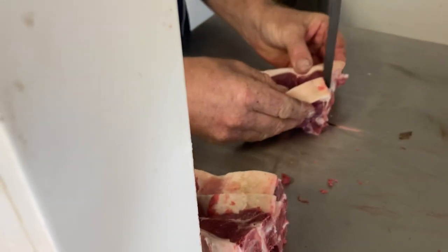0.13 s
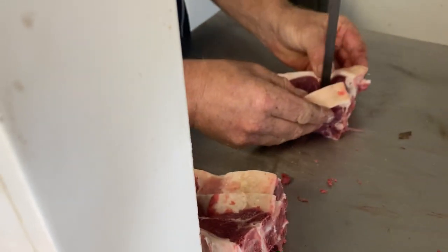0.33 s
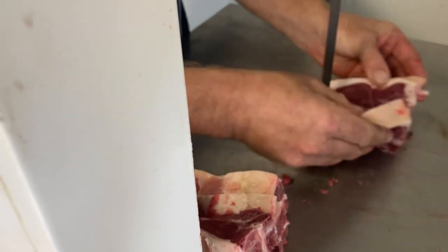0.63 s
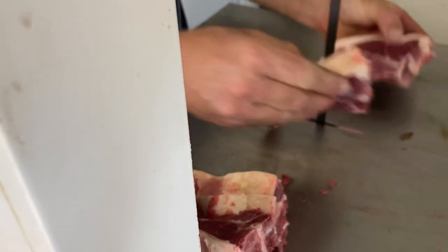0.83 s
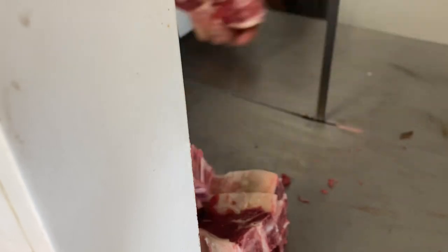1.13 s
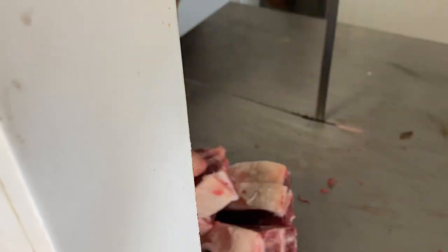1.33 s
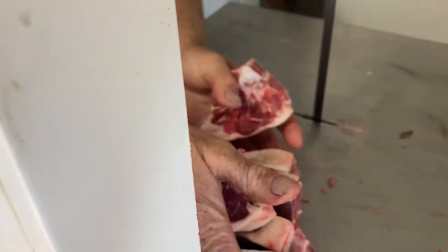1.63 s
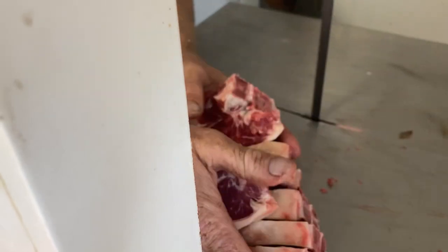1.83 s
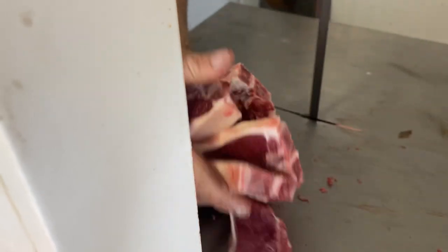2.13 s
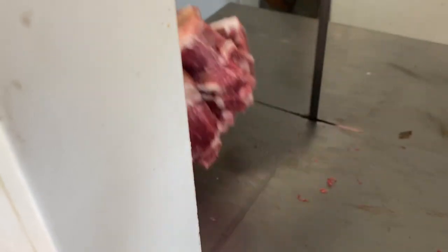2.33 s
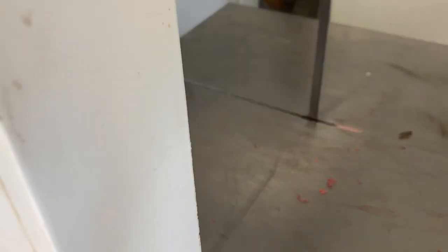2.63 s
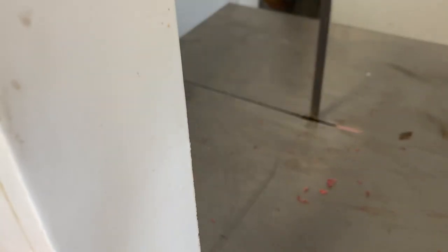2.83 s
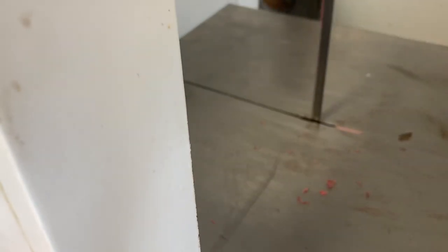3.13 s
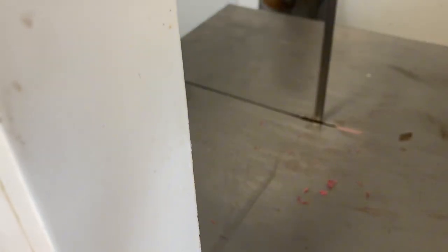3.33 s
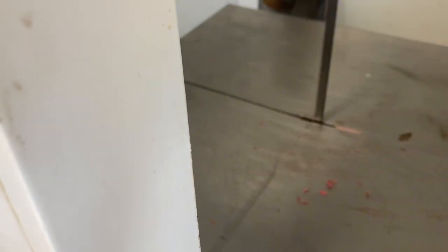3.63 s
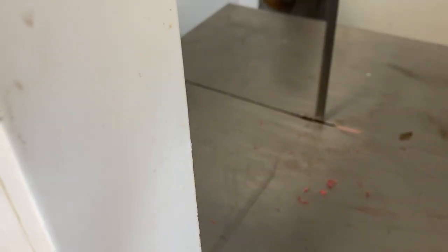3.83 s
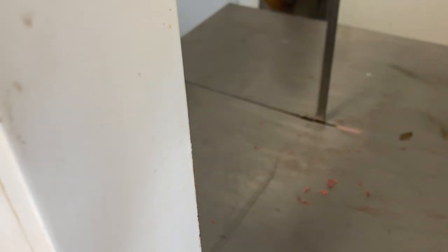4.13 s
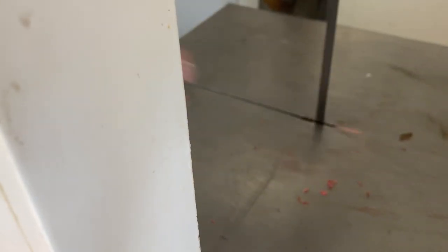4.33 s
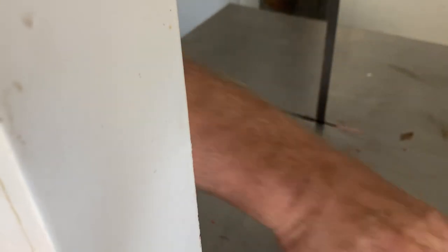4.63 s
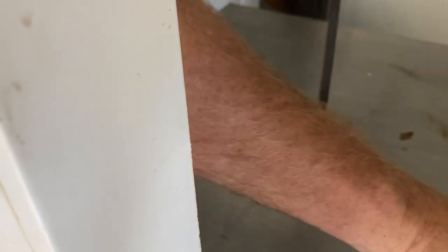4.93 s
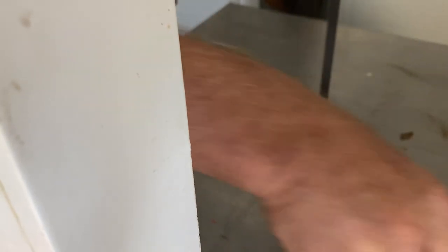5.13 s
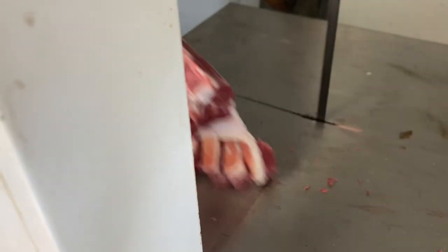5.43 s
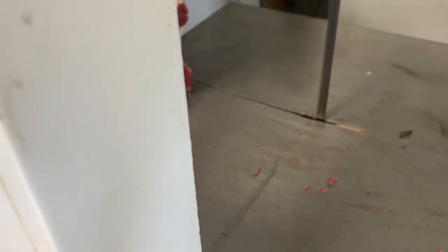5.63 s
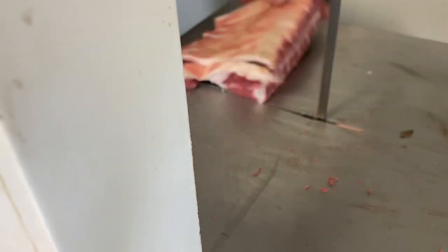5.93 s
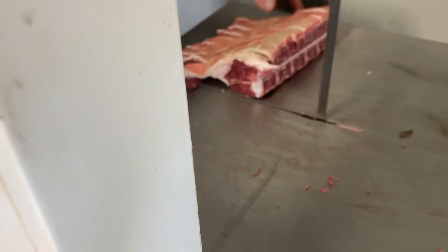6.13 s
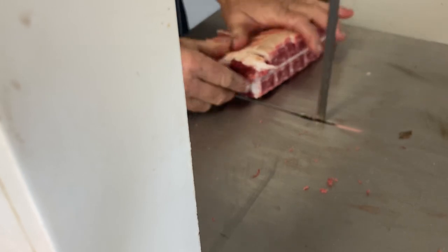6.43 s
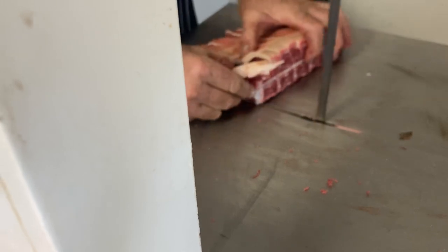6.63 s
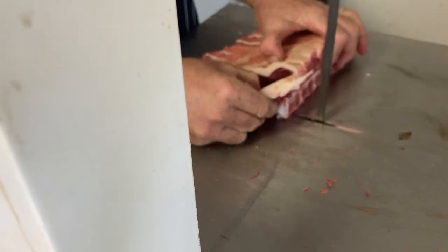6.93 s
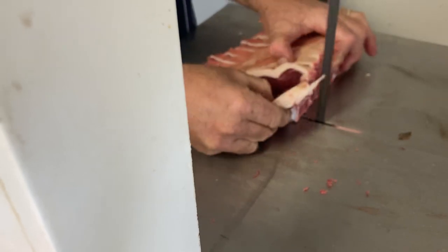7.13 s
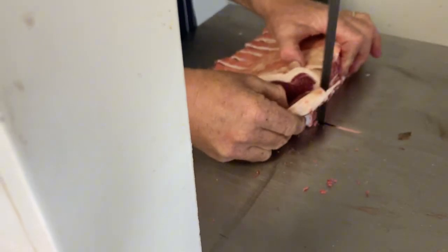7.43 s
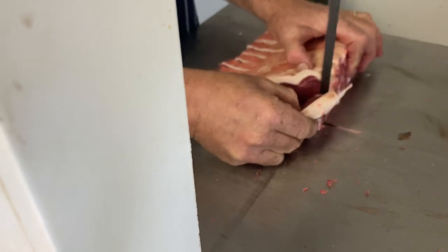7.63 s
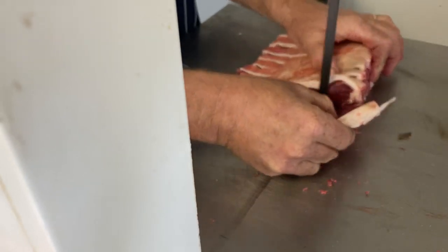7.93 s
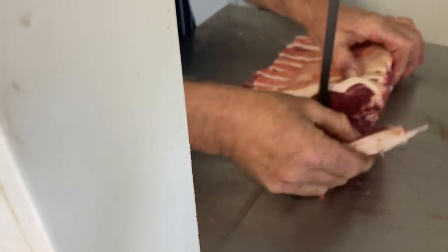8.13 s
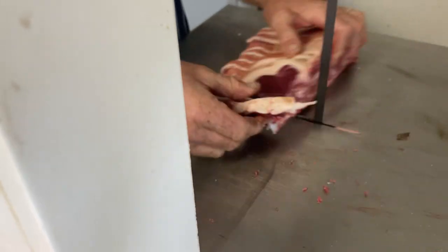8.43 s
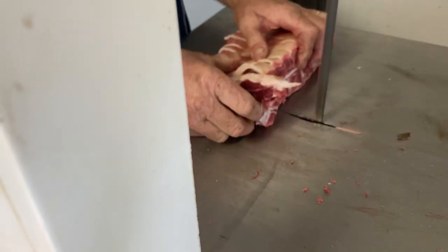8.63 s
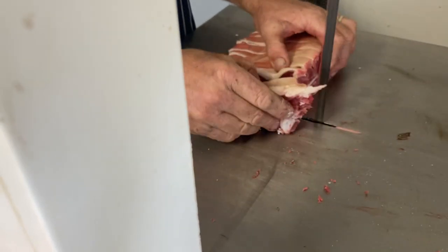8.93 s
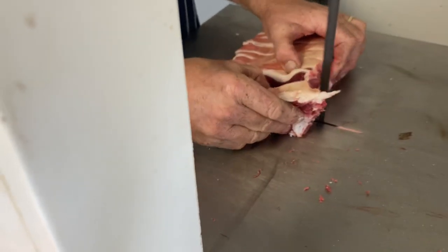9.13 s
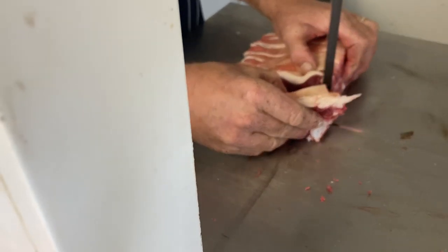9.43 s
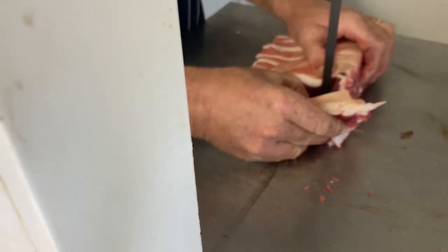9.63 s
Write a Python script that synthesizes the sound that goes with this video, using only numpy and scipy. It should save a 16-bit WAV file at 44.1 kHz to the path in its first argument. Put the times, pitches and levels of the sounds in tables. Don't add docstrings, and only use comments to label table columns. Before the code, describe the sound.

Close bandsaw drone with hissing blade, brief harsh cuts through bony meat at start and end, and quick even board taps during the idle.

```python
import sys
import numpy as np
from scipy import signal
from scipy.fft import rfft, irfft, next_fast_len
from scipy.io import wavfile
from scipy.ndimage import uniform_filter1d, map_coordinates

SR = 44100
rng = np.random.default_rng(int(sys.argv[2]) if len(sys.argv) > 2 else 0)


def put_to_file(sound):
    columns = np.atleast_2d(sound).T
    safe = np.clip(columns, -1, 1)
    whole_steps = np.round(safe * 32767)
    wavfile.write(sys.argv[1], SR, whole_steps.astype(np.int16))


def boost(x):
    u = np.asarray(x, float) / 20
    return 10 ** u


N = 431738
HUM_HZ, TOOTH_HZ = 100.07, 921.5


def unit(x):
    return x / np.sqrt(np.mean(x ** 2) + 1e-20)


def along(points, hz):
    f, value = np.transpose(points)
    return np.interp(np.log(hz + 1), np.log(f + 1), value)


def curves(rows):
    s, *columns = np.transpose(rows)
    t = np.arange(N) / SR
    return [np.interp(t, s, column, left=-120, right=-120) for column in columns]


def wobble(rate, size=N):
    coarse = np.arange(0, size + 32, 32)
    knots = rng.standard_normal(int(size * rate / SR) + 4)
    return np.interp(np.arange(size), coarse, map_coordinates(knots, [coarse * rate / SR]))


def filtered(x, response):
    n = x.shape[-1]
    m = next_fast_len(n + SR // 2)
    return irfft(rfft(x, m) * response(np.fft.rfftfreq(m, 1 / SR)), m)[..., :n]


def rush(response, patchy_db, size=N):
    z = signal.stft(rng.standard_normal(size + 512), nperseg=512)[2]
    field = uniform_filter1d(rng.standard_normal(z.shape), size=6, axis=0)
    field = uniform_filter1d(field, size=10, axis=1)
    patchy = signal.istft(z * boost(patchy_db * unit(field)), nperseg=512)[1][:size]
    return unit(filtered(patchy, response))


def room(x, t60, wet_db):
    t = np.arange(SR // 2) / SR
    tail = rng.standard_normal(len(t)) * boost(-60 * t / t60) * (t > .008)
    return x + boost(wet_db) * signal.fftconvolve(x, tail / np.linalg.norm(tail))[:N]


def swells(rows, t):
    s, half, *columns = np.transpose(rows)[..., None]
    coarse = t[::64]
    bells = np.exp(-np.abs((coarse - s) / half) ** 2.0) + 1e-6
    return lambda weigh: np.interp(t, coarse, (bells * weigh).sum(0)), columns


# time in seconds, hum level in dB, blade hiss relative to the hum in dB.
GAIN = [(0.0, -25, -31), (0.6, -24.5, -40), (0.8, -27, -29.5), (1.15, -25.5, -29.5), (1.26, -21.5, -28.5),
        (1.7, -22, -30), (2.3, -21.5, -27), (3.4, -21.5, -30.5), (4.2, -20.5, -29), (4.65, -20.5, -31.5),
        (5.45, -19.3, -27.5), (7.52, -17.5, -27.5), (7.63, -25, -22), (7.9, -22.5, -26),
        (8.0, -17.5, -29.5), (9.36, -18, -30), (9.5, -25, -31), (9.79, -21, -21)]
# distance below the hum in Hz, level relative to the hum in dB, moment in step in seconds.
BEATS = [(5.04, -16.6, 5.092), (10.086, -17.1, 5.013), (15.112, -27.2, 4.992), (25.2, -35.9, 5.004),
         (7.538, -20.4, 5.017), (22.602, -37.8, 5.004), (9.374, -19.2, 5.026), (2.136, -30.3, 4.855),
         (17.132, -32.2, 4.997), (19.43, -35.6, 4.981), (-20.546, -34, 5.006)]


def hum():
    level, t = boost(curves(GAIN)[0]), np.arange(N) / SR
    turn = 2 * np.pi * HUM_HZ * t
    throb_db = 0.4
    beats = sum(boost(db + throb_db) * np.sin(turn - 2 * np.pi * hz * (t - s)) for hz, db, s in BEATS)
    octave = boost(-18.5 + 1.4 * wobble(9)) * np.sin(2 * turn + 0.68 * wobble(6.4))
    return level * (np.sqrt(2) * (np.sin(turn) + beats) + octave)


# frequency in Hz, density in dB per Hz.
CABINET = [(20, -60), (64, -26), (80, -18.5), (110, -28), (170, -28), (500, -31.5), (780, -32),
           (1300, -31.5), (1970, -40.5), (2770, -37), (3500, -42), (4480, -38), (6000, -47.5),
           (11000, -61.5)]
# centre in Hz, width in Hz, level in dB.
PANELS = [(137, 44, -0.5), (220.4, 22, 4), (370.5, 22, 0.5), (422, 18, -1), (465, 39, 1), (558, 51, -4.5),
          (703, 15, -6.5), (1010, 19, 0), (1133, 33, -3), (1213, 43, 0.5), (1840, 44, -3), (2457, 70, 5.5),
          (2682, 95, 2.5), (2900, 200, -2.5), (2980, 80, -2.5), (4320, 112, 2), (4610, 120, 5),
          (5020, 530, 0.5), (5537, 196, 7), (6640, 470, 1.5)]
# frequency in Hz, rms level in dB.
WHINES = [(500.6, -48.5), (958.2, -53), (1249, -52.5), (1351, -50.5), (2406, -50), (2676, -54.5),
          (2853, -50)]
# frequency in Hz, density in dB per Hz.
AIR = [(3000, -34), (5000, -4), (6570, -3.5), (10100, -10), (13000, -10), (15300, -10.5), (16000, -10)]


def cabinet_response(f):
    peaks = 1 + sum(boost(db + 6) ** 2 / (1 + (2 * (f - c) / width) ** 2) ** 2 for c, width, db in PANELS)
    return boost(along(CABINET, f)) * np.sqrt(peaks)


def machine():
    hum_db, load_db = curves(GAIN)
    t = np.arange(N) / SR
    drone = boost(7.5 + 0.37 * wobble(9)) * rush(cabinet_response, patchy_db=0.74)
    whines = 0
    for hz, db in WHINES:
        level = boost(db + 42.5 + 2.6 * wobble(13))
        whines = whines + level * np.sin(2 * np.pi * hz * t + 0.86 * wobble(12))
    air_level = boost(hum_db + load_db + 4.5 + 0.59 * wobble(25) + 1.3 * wobble(80))
    air = air_level * rush(lambda f: boost(along(AIR, f)), patchy_db=2.0)
    return boost(hum_db - 19.5) * (drone + whines) + air


# frequency in Hz, density in dB per Hz.
TEARING = [(710, -18), (1200, -3), (1320, -12), (1700, -8), (1810, -8), (2090, -6.5), (2680, -2.5),
           (3910, -6), (5530, 0.5), (16000, -1)]


def tearing(tear_db, t):
    once_a_tooth = 1 + 0.26 * np.cos(2 * np.pi * TOOTH_HZ * t)

    def colour(f):
        phase = np.pi * f / TOOTH_HZ
        comb = 1 + 1.17 * np.cos(phase) ** 70 + 0.9 * np.sin(phase) ** 70
        return boost(along(TEARING, f)) * comb

    flutter = boost(1.5 * wobble(90, size=len(t)))
    rip = unit(once_a_tooth * flutter * rush(colour, patchy_db=1.0, size=len(t)))
    deep = filtered(rip, lambda f: 1 / (1 + (f / 4500) ** 4))
    push = boost(tear_db + 1.5)
    sunk = signal.lfilter([1 / 1500], [1, 1 / 1500 - 1], push, zi=[push[0]])[0]
    return boost(tear_db + 4.0) * (rip - deep) + 1.9 * sunk * deep


def sliding(noise, centre_hz, width):
    bank = np.geomspace(350, 900, 7)
    step = np.log(bank[1] / bank[0])
    place = np.log(np.clip(centre_hz, bank[0], bank[-1]))
    out = 0
    for c in bank:
        share = np.clip(1 - abs(place - np.log(c)) / step, 0, 1)
        band = filtered(noise, lambda f: 1 / (1 + (np.log((f + 1) / c) / width) ** 2))
        out = out + np.sqrt(share) * unit(band)
    return out


def steady(x):
    return unit(x / np.sqrt(np.abs(uniform_filter1d(x ** 2, size=1300) + 1e-9)))


# frequency in Hz, density in dB per Hz.
GRIND = [(120, -45), (200, -23.5), (410, -8), (456, -12), (816, -9.5), (926, -5.5), (1130, -18),
         (1330, -11), (2500, -22), (3250, -52), (5500, -120)]
# time in seconds, half length in seconds, grind in dB, pitch in Hz.
BONES = [(0.09, 0.071, -34, 607), (0.245, 0.06, -27, 760), (0.34, 0.025, -43, 590),
         (0.495, 0.071, -29, 644), (0.59, 0.071, -36, 607), (7.575, 0.025, -40, 467),
         (7.68, 0.074, -39.5, 620), (7.79, 0.046, -35.5, 545), (7.93, 0.066, -38, 577),
         (8.015, 0.028, -24, 670), (8.095, 0.042, -26, 475), (8.18, 0.06, -30.5, 554),
         (9.39, 0.029, -30.5, 493), (9.53, 0.078, -34, 540), (9.61, 0.03, -37, 620), (9.7, 0.05, -45, 570),
         (9.79, 0.027, -23, 520)]


def grinding(t):
    on_bone, (bone_db, bone_hz) = swells(BONES, t)
    grind_hz = on_bone(boost(bone_db) * bone_hz) / on_bone(boost(bone_db))
    bone = rush(lambda f: boost(along(GRIND, f)), patchy_db=2.5, size=len(t))
    return on_bone(boost(bone_db - 0.7)) * steady(1.15 * bone + sliding(bone, grind_hz, width=0.1))


def teeth(colour, t, waver_db, rough_db, drift):
    hz = TOOTH_HZ / 2 * np.arange(1, 25)
    odd = np.arange(len(hz)) % 2 == 0
    level_db = along(colour, hz) - 4 * odd
    turn = 2 * np.pi * t + drift * wobble(60, size=len(t)) / TOOTH_HZ
    heard, out = level_db > -32, 0
    for f, db in zip(hz[heard], level_db[heard]):
        depth_db = waver_db * np.tanh(-db / 6 + 0.15)
        waver = depth_db * wobble(30.06, size=len(t))
        out = out + boost(db + waver) * np.sin(f * turn + rng.uniform(0, 2 * np.pi))
    return unit(out * boost(rough_db * wobble(150, size=len(t))))


# frequency in Hz, level in dB.
NOTE = [(300, -30), (460, -5.5), (920, 0), (1400, -5), (1840, -9.5), (2300, -15), (2760, -18), (3300, -11),
        (4200, -57)]
# frequency in Hz, level in dB.
RING = [(2000, -40), (2770, -20), (3230, -16), (3690, 0), (4150, -13), (4610, -15), (5530, -19),
        (6450, -22), (7380, -15), (8300, -24), (10100, -19), (12000, -28)]
# time in seconds, half length in seconds, tooth note in dB, blade ring in dB.
SONGS = [(0.0, 0.03, -33.5, -44), (0.065, 0.04, -31.5, -39), (0.15, 0.05, -29.5, -46),
         (0.285, 0.041, -30, -51), (0.39, 0.045, -35.5, -39), (0.495, 0.044, -43, -21),
         (0.56, 0.037, -37, -29.5), (7.56, 0.06, -47, -50), (7.66, 0.054, -33.5, -48),
         (7.78, 0.058, -30.5, -40), (7.89, 0.095, -37, -56), (8.04, 0.053, -24.5, -44),
         (8.12, 0.04, -44, -55), (9.37, 0.03, -45, -42), (9.43, 0.035, -30, -32.5), (9.52, 0.088, -37, -51),
         (9.61, 0.032, -27.5, -48), (9.69, 0.044, -35, -51), (9.79, 0.028, -24, -34)]


def singing(t):
    in_song, (sung_db, rung_db) = swells(SONGS, t)
    note = teeth(NOTE, t, waver_db=3.5, rough_db=3.3, drift=1.2)
    ring = teeth(RING, t, waver_db=3, rough_db=2.8, drift=.38)
    ring_db = 20 * np.log10(in_song(boost(rung_db)))
    squeal_db = ring_db + 0.27 * np.minimum(ring_db + 26, 0)
    return in_song(boost(sung_db)) * note + boost(squeal_db + 2.9) * ring


# time in seconds, tearing level in dB.
FEED = [
    [(0.0, -26), (0.15, -29), (0.246, -28), (0.274, -31), (0.308, -71), (0.34, -62)],
    [(0.34, -62), (0.362, -34.5), (0.404, -28), (0.488, -31), (0.552, -26.5), (0.648, -66), (0.72, -64)],
    [(7.44, -51), (7.522, -21.5), (7.574, -23), (7.616, -27.5), (7.714, -24), (7.756, -26), (7.8, -33),
     (7.83, -55), (7.892, -64)],
    [(7.892, -63), (7.968, -37), (8.014, -37), (8.058, -43), (8.096, -40), (8.168, -48), (8.3, -61)],
    [(9.28, -47), (9.325, -52), (9.333, -23), (9.418, -23), (9.526, -26.5), (9.612, -29), (9.652, -60),
     (9.742, -49), (9.79, -29)],
]


def cutting():
    feed_db = np.max([curves(bite)[0] for bite in FEED], axis=0)
    biting = feed_db > -119
    t = np.flatnonzero(biting) / SR
    sound = np.zeros(N)
    sound[biting] = tearing(feed_db[biting], t) + grinding(t) + singing(t)
    return room(sound, t60=0.26, wet_db=-8.0)


def puffs(rows, width, rise, gain_db):
    out, t = np.zeros(N + SR), np.arange(SR // 4) / SR
    f = np.fft.rfftfreq(len(t), 1 / SR)
    for s, db, hz, t60 in rows:
        band = 1 / (1 + (np.log((f + 1) / hz) / width) ** 4)
        noise = unit(irfft(rfft(rng.standard_normal(len(t))) * band, len(t)))
        envelope = boost(db + gain_db - 60 * t / max(t60, .01)) * (1 - np.exp(-t / rise))
        out[round(s * SR):][:len(t)] += envelope * noise
    return out[:N]


# start in seconds, peak level in dB, pitch in Hz, 60 dB decay in seconds.
SCUFFS = [(.26, -19, 1380, 0.077), (.435, -20, 1500, .06), (.475, -7, 1700, 0.055),
          (.547, -15.5, 1580, 0.12), (1.07, -30, 2400, .06), (2.279, -22, 1400, 0.074),
          (3.62, -25, 1900, 0.19), (3.622, -25, 1700, 0.17), (3.624, -23, 1050, 0.19),
          (7.975, -16.5, 3660, 0.17), (8.008, -22, 1330, 0.092), (8.069, -28, 1340, 0.1),
          (9.532, -21, 2730, .1), (9.595, -10, 1300, 0.074), (9.76, -15, 1200, .12)]


def scuffs():
    return puffs(SCUFFS, width=0.4, rise=0.011, gain_db=-5.5)


# start in seconds, peak level in dB, pitch in Hz.
TICKS = [(1.0705, -29, 9700), (1.4137, -32, 14000), (1.5404, -30, 12600), (1.7045, -28, 12300),
         (1.7634, -32, 8970), (1.925, -33, 12500), (1.9709, -29, 13600), (2.1311, -24, 14400),
         (2.2533, -25, 14600), (2.4169, -29, 13600), (2.582, -24, 14000), (2.6643, -31, 8740),
         (2.7357, -28, 14100), (2.8784, -34, 9160), (3.029, -33, 9910), (3.6895, -31, 11700),
         (3.7978, -26.5, 11800), (4.3944, -31, 10600), (4.443, -31, 8410), (4.8374, -30, 8300),
         (4.8763, -29, 9880), (5.1422, -28, 12600), (5.2834, -26, 14900), (5.7458, -26, 10500),
         (6.1784, -28, 12500), (6.6248, -33, 11500), (7.0743, -27, 10700), (8.7415, -31, 11500),
         (8.8722, -25, 10500), (9.3317, -22, 13500)]


def ticks():
    return puffs([(*tick, 0.09) for tick in TICKS], width=0.44, rise=0.0037, gain_db=-6.5)


def crumbs():
    times = rng.uniform(.7, 8.4, 60)
    specks = [(s, -33 + 3 * a, 11500 * boost(2.5 * b), 0.03)
              for s, a, b in zip(times, *rng.standard_normal((2, 60)))]
    return puffs(specks, width=0.3, rise=0.001, gain_db=-8.5)


TAPS = [-15, -16, -13, -14, -16, -14, -12.5, -11, -17.5]
# frequency in Hz, level in dB, 60 dB decay in seconds.
BOARD = [(365, -8, .08), (410, 0, .1), (465, 0, .1), (520, -7, .07), (620, -17, .05), (860, -5, .08),
         (2200, -17, .04)]


def taps():
    first_s, gap_s = 2.017, 0.1328
    out, t = np.zeros(N + SR), np.arange(SR // 2) / SR
    thud_band = signal.butter(2, [300, 750], "bandpass", fs=SR, output="sos")
    for s, db in zip(first_s + gap_s * np.arange(len(TAPS)), TAPS):
        ring = 0
        for hz, level, t60 in BOARD:
            ring = ring + boost(level + rng.uniform(-1.1, 1) - 60 * t / t60) * np.sin(2 * np.pi * hz * t)
        thud = unit(signal.sosfilt(thud_band, rng.standard_normal(len(t))))
        ring += 0.39 * boost(-60 * t / 0.089) * thud
        low = boost(-4.5 - 60 * t / 0.23) * np.sin(2 * np.pi * 220 * t) * (1 - np.exp(-t / 0.0069))
        out[round(s * SR):][:len(t)] += boost(db - 7) * (ring * (1 - np.exp(-t / 0.0036)) + low)
    return room(out[:N], t60=0.33, wet_db=-4.5)


def scene():
    mix = hum() + machine() + cutting() + scuffs() + ticks() + crumbs() + taps()
    return np.array([mix, mix])


def top_cut(x):
    return signal.sosfilt(signal.butter(12, 16590, fs=SR, output="sos"), x)


def record(dry):
    return top_cut(filtered(dry, lambda f: f < 15740))


dry = scene()
out = record(dry)
put_to_file(out)
```